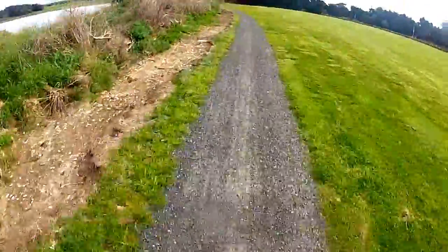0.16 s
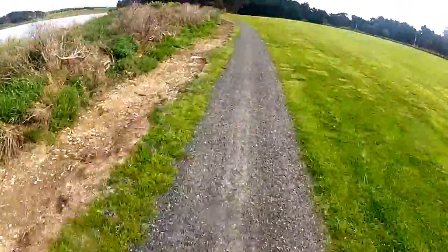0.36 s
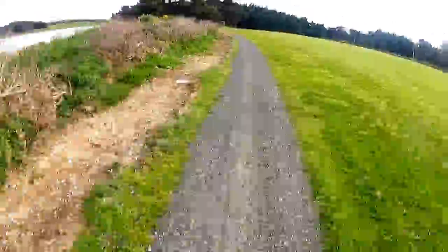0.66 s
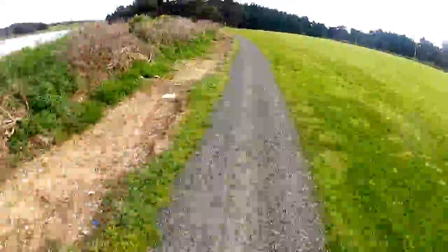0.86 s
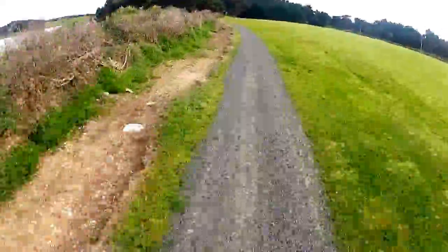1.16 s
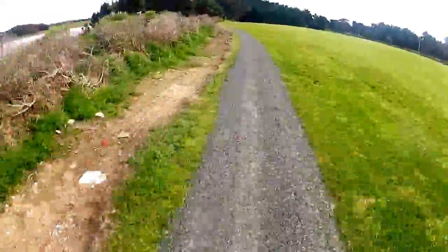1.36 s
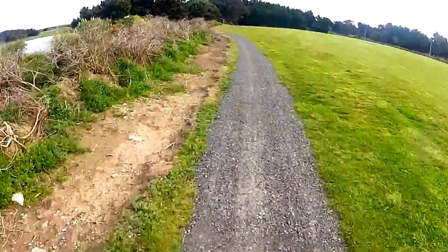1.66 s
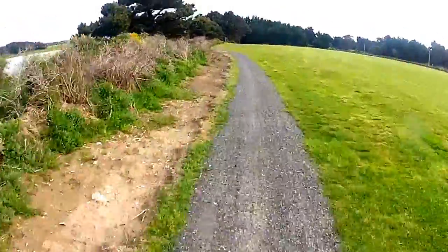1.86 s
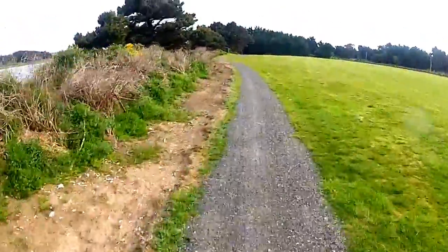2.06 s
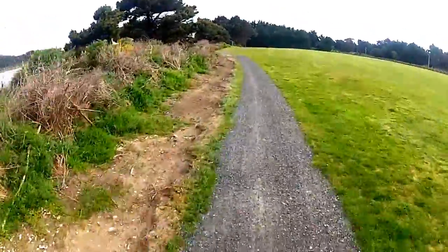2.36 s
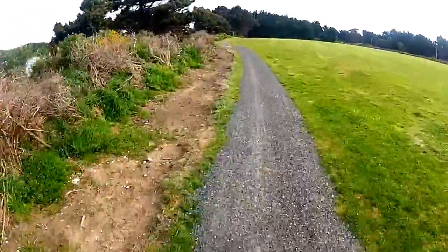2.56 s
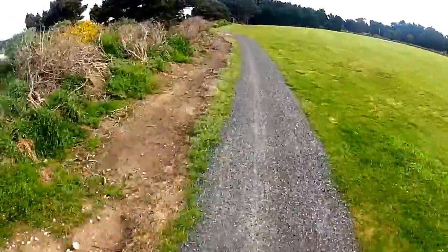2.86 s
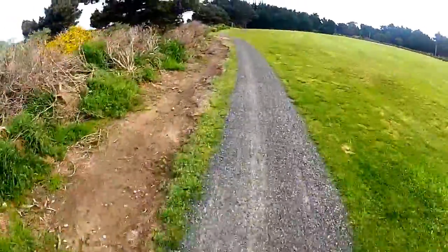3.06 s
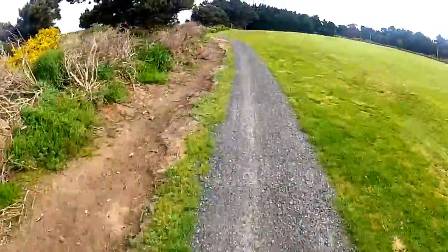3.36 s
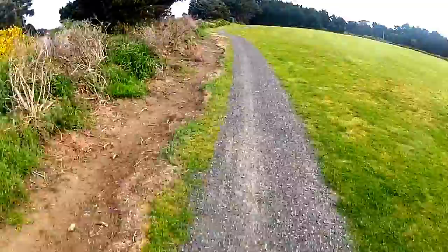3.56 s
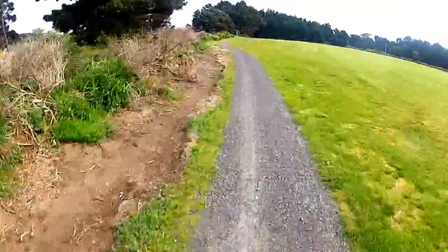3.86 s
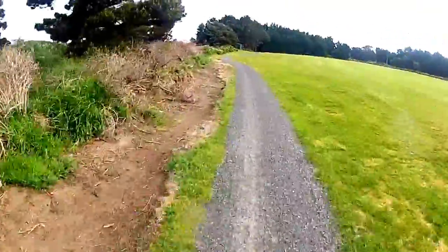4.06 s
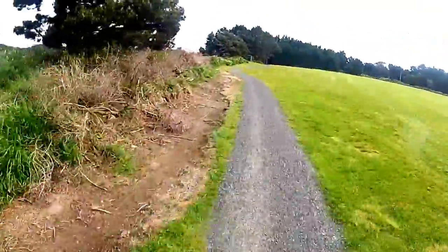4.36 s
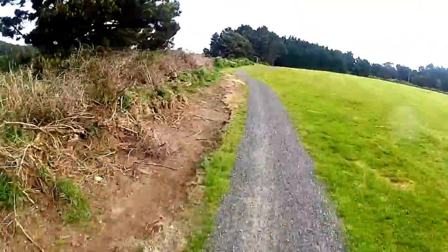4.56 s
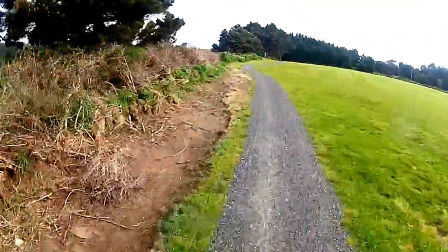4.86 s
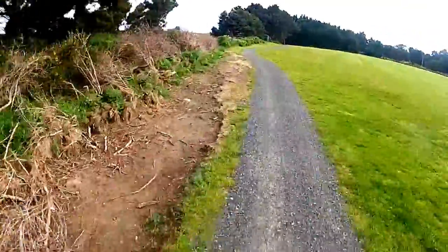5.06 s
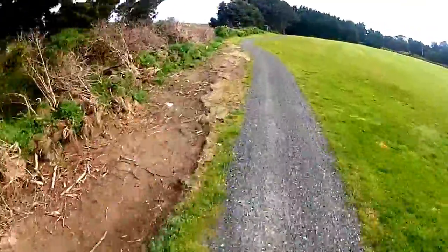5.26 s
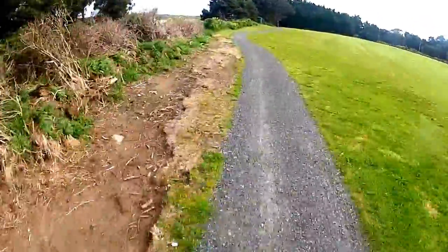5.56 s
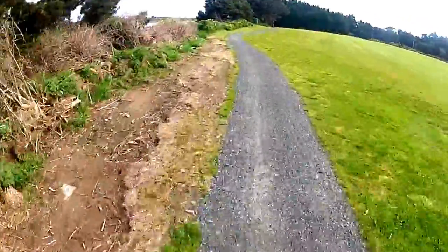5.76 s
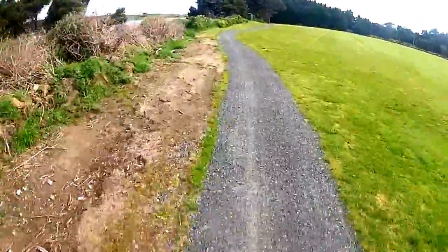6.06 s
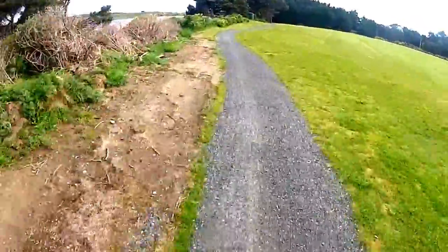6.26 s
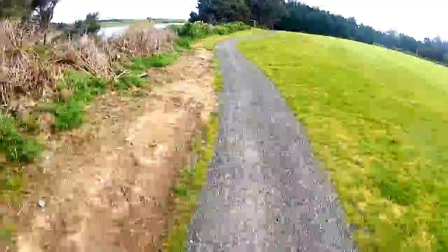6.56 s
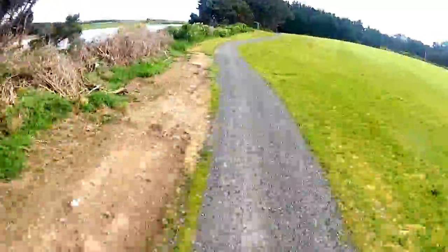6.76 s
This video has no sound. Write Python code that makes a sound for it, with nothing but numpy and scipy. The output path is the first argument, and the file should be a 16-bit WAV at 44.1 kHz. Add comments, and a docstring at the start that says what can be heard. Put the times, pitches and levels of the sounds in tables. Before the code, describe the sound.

Mountain bike tyres roll continuously over a gravel path outdoors, a grainy roar with crackling stones. A fairly smooth start soon gives way to irregular thumps and hollow rattling knocks, with dense clusters around four seconds and shortly before five, then sparser knocks. A few hard dry clacks stand out. Low wind buffets the plastic housing of a camera mounted on the bike, so everything is close and slightly boxy, without echo.

```python
"""Tyres crunch on a gravel path, heard from a camera in a closed plastic housing riding on a mountain bike.
Random trains of tiny impacts, filtered, make the tread and stones; filtered noise makes wind buffeting
and short bright bursts. Bumps thump and shudder the mount; loose parts knock as damped modes, rough with
noise. Hard blows clack dryly as filtered clicks; the right side dips briefly at listed times."""
import sys
import numpy as np
from scipy.fft import rfft, irfft, next_fast_len
from scipy.io import wavfile
from scipy.ndimage import map_coordinates

SR = 44100
rng = np.random.default_rng(int(sys.argv[2]) if len(sys.argv) > 2 else 0)


def transcribe(u):
    """Save the signal u as a 16-bit wav file named by the first command-line argument.

    u: samples, shape (n,) or (channels, n), limited to [-1, 1]; the rate is SR.
    q: integer samples, one column per channel.
    """
    v = np.clip(np.atleast_2d(u).T, -1, 1)
    q = np.round(v * 32767).astype(np.int16)
    wavfile.write(sys.argv[1], SR, q)


N = 304731


def amp(db):
    """Decibels to gain."""
    return 10 ** (np.asarray(db) / 20)


def unit(x):
    """Scaled to rms 1."""
    return x / np.sqrt(np.mean(x ** 2) + 1e-20)


def noise(*shape):
    """White noise."""
    return rng.standard_normal(shape)


def wobble(knots_per_s):
    """A smooth random curve through normally distributed knots."""
    knots = noise(int(N * knots_per_s / SR) + 4)
    return map_coordinates(knots, [np.arange(N) * knots_per_s / SR])


def about_mean(rows):
    """A level curve in dB about its own mean, one value per sample."""
    db = np.interp(np.arange(N) / SR, *np.transpose(rows))
    return db - db.mean()


def coloured(x, points):
    """x through a causal minimum-phase filter with the given (Hz, dB) points."""
    n = x.shape[-1]
    m = 2 * next_fast_len(n // 2 + 2048)
    hz, db = np.transpose(points)
    log_hz = np.log(np.fft.rfftfreq(m, 1 / SR) + 1)
    gain = amp(np.interp(log_hz, np.log(hz), db))
    # folding the cepstrum onto positive time gives minimum phase
    cepstrum = irfft(np.log(gain), m)
    cepstrum[1:m // 2] *= 2
    cepstrum[m // 2 + 1:] = 0
    response = np.exp(rfft(cepstrum))
    return irfft(rfft(x, m) * response, m)[..., :n]


def spread(pair, side_db):
    """Two unrelated signals become the middle and side of a stereo image."""
    mid, side = pair[0], amp(side_db) * pair[1]
    return unit(np.array([mid + side, mid - side]))


def stones(rate, scatter_db):
    """Two random trains of tiny impacts of widely varying size, rate per second on average."""
    struck = rng.random((2, N)) < rate / SR
    sign = np.sign(noise(2, N))
    size = amp(scatter_db * np.minimum(noise(2, N), 2.5))
    return unit(struck * sign * size)


def add(track, s, sound):
    """Mixes a sound into the track from time s."""
    start = max(round(s * SR), 0)
    part = track[..., start:start + sound.shape[-1]]
    part += sound[..., :part.shape[-1]]


def swell(t, attack, t60):
    """A rounded rise and an exponential decay."""
    return (1 - np.exp(-(t / attack) ** 2)) * amp(-60 * t / t60)


def ringing(t, modes, attack, detune):
    """Damped modes, each strike varying their levels and pitches a little."""
    out = np.zeros(len(t))
    for hz, db, t60 in modes:
        level = amp(db + rng.normal(0, 1))
        tone = np.sin(2 * np.pi * hz * rng.normal(1, detune) * t)
        out += level * swell(t, attack, t60) * tone
    return out


def push(t, width, sway, sway_hz, sway_t60, lag):
    """A soft blow centred on t = 0; the camera swings back on its springy mount."""
    after = np.maximum(t - lag, 0)
    swing_back = sway * np.sin(2 * np.pi * sway_hz * after) * amp(-60 * after / sway_t60)
    return np.exp(-.5 * (t / width) ** 2) - swing_back


# Tyre effort on the gravel. Each row: time in seconds, level in dB (only the change about the mean counts).
EFFORT = [(0.0, -53.5), (0.27, -52), (0.75, -50), (0.87, -45), (1.0, -45.5), (1.33, -45.5), (1.5, -47),
          (1.98, -46.5), (2.69, -48.5), (3.4, -48), (3.66, -48), (4.18, -45.5), (4.55, -45), (4.88, -45.5),
          (5.01, -43.5), (5.3, -47), (5.55, -47), (5.72, -47), (5.92, -44), (6.15, -47), (6.32, -49),
          (6.83, -49), (6.91, -48)]
# Spectra of tread roar, stone crunch and bright tick. Each row: frequency in Hz, relative level in dB per Hz.
ROAR_COLOUR = [(250, -11.5), (450, -14), (650, -14), (830, -4), (980, -6.5), (1210, -0.5), (1480, -11.5),
               (2000, -10.5), (4000, -78)]
CRUNCH_COLOUR = [(500, -28), (1100, 2.5), (1500, 2), (1800, 7), (2100, 5.5), (2400, 7.5), (2800, -7.5),
                 (3200, -7), (3600, -7), (4050, -14), (4500, -83), (6000, -84.5)]
SIZZLE_COLOUR = [(6000, -45), (7400, -73), (8400, 11.5), (9000, -4), (9600, 15), (11000, 13.5),
                 (11700, -31.5), (12400, -20), (13100, 14.5), (14300, 10), (15000, -5), (15700, -9.5)]
# level at mean effort; dB per dB of effort
ROAR_DB, ROAR_GROWS = -46, 0.76
CRUNCH_DB, CRUNCH_GROWS = -50, 1.23
PATCH_DB = 1.09  # looser and firmer patches of gravel


def tyres():
    """The tread roars on the ground; stones grind under it in clumps, with a crunch and a bright tick."""
    effort_db = about_mean(EFFORT) + PATCH_DB * wobble(14)
    roar_db = ROAR_DB + ROAR_GROWS * effort_db
    crunch_db = CRUNCH_DB + CRUNCH_GROWS * effort_db
    clumps = wobble(45)
    tread = stones(rate=4000, scatter_db=3.5)
    grit = stones(rate=2500, scatter_db=-0.5)
    hissy_grit = grit + 0.5 * noise(2, N)
    roar = amp(roar_db + 0.74 * clumps) * spread(coloured(tread, ROAR_COLOUR), side_db=-65.0)
    crunch = amp(crunch_db + 0.47 * clumps) * spread(coloured(grit, CRUNCH_COLOUR), side_db=-58.5)
    sizzle = spread(coloured(hissy_grit, SIZZLE_COLOUR), side_db=-42.5)
    return roar + crunch + amp(crunch_db - 8.0 + 1.4 * clumps) * sizzle


# Spectrum of fine flying grit. Each row: frequency in Hz, relative level in dB per Hz.
SPRAY_COLOUR = [(2200, -46), (3100, -13.5), (3600, 10), (4000, -8), (4600, -61), (6000, -76.5)]
SPRAY_DB, SPRAY_GROWS = -66.5, 2.6  # level at mean effort; dB per dB of effort
CLINK_DB, COARSE_DB = -4.5, -7.5  # relative to the crunch
COARSE_PER_S, COARSE_TICK_DB = 60, -11  # tick relative to crackle
CLUSTER_DB = 1.5  # bunching


def pebbles():
    """Bigger stones crackle and clink in clusters, each clink at its own pitch; grit sprays with effort."""
    effort_db = about_mean(EFFORT)
    clinks = np.zeros(N)
    t = np.arange(SR // 25) / SR
    for when, size, pitch, life in rng.random((round(110 * N / SR), 4)):
        hz = 1000 * 2.5 ** pitch
        envelope = swell(t, attack=.0005, t60=.008 + .016 * life)
        add(clinks, when * N / SR, amp(11 * size) * envelope * np.sin(2 * np.pi * hz * t))
    coarse = stones(rate=COARSE_PER_S, scatter_db=2.5)[0]
    tick = amp(COARSE_TICK_DB) * unit(coloured(coarse, SIZZLE_COLOUR))
    crackle = unit(coloured(coarse, CRUNCH_COLOUR)) + tick
    fine = stones(rate=880, scatter_db=3.5)[0]
    spray = amp(SPRAY_DB + SPRAY_GROWS * effort_db) * unit(coloured(fine, SPRAY_COLOUR))
    big_stones = amp(CLINK_DB) * unit(clinks) + amp(COARSE_DB) * crackle
    big_stones = amp(CRUNCH_DB + CRUNCH_GROWS * effort_db) * big_stones
    return amp(CLUSTER_DB * wobble(17)) * (spray + big_stones)


FULL_JOLT_DB = -13  # peak of a full jolt


def rough_ground(width_s):
    """Rises from 0 on even path towards 1 around the hardest jolts."""
    t = np.arange(N) / SR
    bumps = sum(amp(db - FULL_JOLT_DB) * np.exp(-.5 * ((t - s) / width_s) ** 2) for s, db in JOLTS)
    return np.tanh(bumps)


# Air on the housing. Each row: time in seconds, level in dB (only the change about the mean counts).
WIND_LEVEL = [(0.0, -43.5), (0.18, -44.5), (0.3, -57.5), (0.48, -46.5), (0.76, -38.5), (1.06, -52.5),
              (1.4, -41), (1.9, -53), (2.13, -42.5), (2.7, -46), (2.89, -55), (3.03, -44), (3.5, -43),
              (3.78, -37), (4.7, -43), (4.88, -45), (5.0, -40), (5.15, -44), (5.72, -52.5), (6.12, -38.5),
              (6.5, -46), (6.76, -36), (6.91, -34)]
# Spectra of wind buffeting and road judder. Each row: frequency in Hz, relative level in dB per Hz.
BUFFET_COLOUR = [(8, -6), (20, 7), (36, -4), (55, -10), (90, -17.5), (200, -60.5), (500, -105)]
JUDDER_COLOUR = [(40, -16), (90, -2.5), (140, 0.5), (210, 3.5), (330, -3.5), (450, -24), (900, -71.5)]
BUFFET_DB, BUFFET_GROWS = -40, 0.52  # level in mean wind; dB per dB of wind
JUDDER_DB, JUDDER_GROWS = -54.5, 0.26  # level on even ground at mean effort; dB per dB of effort
# scale of the swell around a jolt; its limit in dB
LURCH_S, LURCH_DB = 0.025, 11
SHUDDER_S, SHUDDER_DB = .02, 11
GUST_DB = -1.5


def rumble():
    """Wind buffets the housing while the ground makes it judder; both swell around the jolts."""
    buffet_db = BUFFET_DB + BUFFET_GROWS * about_mean(WIND_LEVEL)
    buffet_db = buffet_db + LURCH_DB * rough_ground(LURCH_S) + GUST_DB * wobble(18)
    judder_db = JUDDER_DB + JUDDER_GROWS * about_mean(EFFORT)
    judder_db = judder_db + SHUDDER_DB * rough_ground(SHUDDER_S) + 1.9 * wobble(25)
    buffet = spread(coloured(noise(2, N), BUFFET_COLOUR), side_db=-68.5)
    judder = spread(coloured(stones(rate=400, scatter_db=4.5), JUDDER_COLOUR), side_db=-38.5)
    return amp(buffet_db) * buffet + amp(judder_db) * judder


KNOCK_DB = -21  # ring of an ordinary knock


def follows(rule, ring_db):
    """The level of one part of a knock whose ring has the given level."""
    ordinary_db, grows = rule
    return ordinary_db + grows * (ring_db - KNOCK_DB)


# Ring of the housing and hollow clack. Each row: frequency in Hz, level in dB, t60 in seconds.
HOUSING_MODES = [(1214, -3, 0.026), (1156, -17.5, 0.01), (1490, -0.5, 0.0099), (1774, -9, 0.014),
                 (2155, -14, 0.009)]
HOLLOW_MODES = [(819, -0.5, 0.022), (880, -11, 0.0096), (278, -25, 0.017)]
# level in dB in an ordinary knock; dB per dB of ring
KNOCK_HOLLOW = (-31, 0.7)
KNOCK_RASP, KNOCK_TICK = (-54, 0.93), (-61.5, 1)
KNOCK_BRIGHT_BURST = (-91, 2.4)  # a faint burst of bright noise with the knock
KNOCK_SHUDDER, KNOCK_SCUFF = (-51, 0.45), (-54, 0.42)
LEAD_S = .005  # contact comes this far into the blow
BOUNCE_S, BOUNCE_LOSS_DB = .004, 9.5  # mean flight; loss per bounce


def blow(ring_db, thud_db):
    """A thud, hollow clack and short housing ring, roughened by noise; the part bounces twice."""
    t_raw = np.arange(SR // 10) / SR
    t = np.maximum(t_raw - LEAD_S, 0)
    chatter = noise(len(t)) * swell(t, attack=.0008, t60=.018)
    parts = [(KNOCK_RASP, CRUNCH_COLOUR), (KNOCK_TICK, SIZZLE_COLOUR), (KNOCK_BRIGHT_BURST, BURST_COLOUR),
             (KNOCK_SHUDDER, JUDDER_COLOUR), (KNOCK_SCUFF, ROAR_COLOUR)]
    rough = sum(amp(follows(rule, ring_db)) * unit(coloured(chatter, colour)) for rule, colour in parts)
    thud = push(t_raw - LEAD_S - .0015, width=0.0011, sway=0.49, sway_hz=62.7, sway_t60=0.041, lag=0.0012)
    sound = rough + amp(thud_db) * thud
    hollow_db = follows(KNOCK_HOLLOW, ring_db)
    for bounce in range(3):
        since = np.maximum(t - bounce * BOUNCE_S * (.5 + rng.random()), 0)
        ring = amp(ring_db) * ringing(since, HOUSING_MODES, attack=.0012, detune=.03)
        clack = amp(hollow_db) * ringing(since, HOLLOW_MODES, attack=.0011, detune=.025)
        sound = sound + amp(-BOUNCE_LOSS_DB * bounce) * (ring + clack)
    return sound


RATTLES_PER_S, RATTLE_DB, RATTLE_THUD_DB = 4.8, -40.5, -47.5
RATTLE_SCATTER_DB, RATTLE_GROWS = 5.5, 0.81  # scatter either way; dB per dB of effort


def rattles():
    """Faint knocks come at random, stronger when the tyres work harder."""
    out, effort_db = np.zeros((2, N)), about_mean(EFFORT)
    for when, size in rng.random((round(RATTLES_PER_S * N / SR), 2)):
        lift_db = RATTLE_GROWS * effort_db[int(when * N)] + RATTLE_SCATTER_DB * (2 * size - 1)
        add(out, when * N / SR, blow(RATTLE_DB + lift_db, RATTLE_THUD_DB + lift_db))
    return out


# Single stones under the tread. Each row: start in seconds, level of the rasp in dB.
STONE_CRUNCHES = [(0.037, -58.5), (0.1305, -55.5), (0.431, -62), (0.508, -54), (0.661, -53),
                  (0.7257, -56.5), (0.954, -51), (1.1829, -49.5), (1.2765, -50.5), (1.362, -52.5),
                  (2.28, -52), (2.352, -47.5), (2.455, -52.5), (2.58, -57.5), (3.628, -55), (3.905, -51.5),
                  (4.678, -47.5), (4.932, -60), (5.167, -57.5), (5.758, -54), (6.832, -52.5)]
CRUNCH_TICK_DB = -10  # relative to the rasp


def crunches():
    """A single stone grinds under the tread: a rasp and a bright tick, with no ring."""
    out = np.zeros(N)
    t = np.arange(SR // 10) / SR
    for s, db in STONE_CRUNCHES:
        chatter = noise(len(t)) * swell(t, attack=.0008, t60=.018)
        rasp = unit(coloured(chatter, CRUNCH_COLOUR))
        tick = amp(CRUNCH_TICK_DB) * unit(coloured(chatter, SIZZLE_COLOUR))
        add(out, s, amp(db) * (rasp + tick))
    return out


# Short bright noise bursts. Each row: start in seconds, level in dB before an 11 dB lift,
# t60 in seconds, treble against the body in dB.
BRIGHT_BURSTS = [(0.1915, -56, 0.025, -1.5), (0.2813, -66, 0.026, -10), (2.2793, -52, 0.026, -7),
                 (2.5838, -42, 0.017, -5), (2.7645, -47, 0.022, -0.5)]
# Spectrum of a burst. Each row: frequency in Hz, relative level in dB per Hz.
BURST_COLOUR = [(2500, -23.5), (4400, 7), (5500, -15), (7000, -10), (9000, 6), (11500, -3.5), (15000, -13)]
BURST_ATTACK_S, BURST_TILT_HZ = .0028, 6000  # treble lies above the tilt


def bright_bursts():
    """Short bright noise bursts, some dull and some bright: filtered noise that rises fast and decays."""
    out = np.zeros(N)
    t = np.arange(SR // 15) / SR
    for s, db, t60, treble_db in BRIGHT_BURSTS:
        colour = [(hz, level + treble_db * (hz > BURST_TILT_HZ)) for hz, level in BURST_COLOUR]
        burst = swell(t, BURST_ATTACK_S, t60) * unit(coloured(noise(len(t)), colour))
        add(out, s, amp(db + 11.0) * burst)
    return out


# Loose parts. Each row: contact in seconds, level of the ring in dB, level of the thud in dB.
LOOSE_KNOCKS = [(0.5083, -28, -31), (0.6519, -27.5, -40), (0.6606, -25, -47), (0.7265, -32, -27),
                (0.9546, -23, -23), (0.9641, -25.5, -25.5), (1.175, -21, -24), (1.191, -27, -33),
                (1.2972, -23, -23.5), (1.3623, -24.5, -25.5), (1.4605, -24, -23), (1.6855, -22, -35),
                (2.0263, -23.5, -39), (2.046, -25.5, -21.5), (2.136, -36, -35), (2.49, -34.5, -30),
                (2.531, -25.5, -28), (2.5802, -33.5, -25.5), (2.5898, -11, -25), (2.771, -28, -22),
                (2.7878, -19, -30), (2.936, -35.5, -27), (2.952, -26, -25), (3.0464, -30.5, -34),
                (3.1519, -24.5, -30.5), (3.32, -31, -29.5), (3.6085, -29, -28.5), (3.724, -29, -37),
                (3.8034, -31.5, -29.5), (3.9063, -23, -26.5), (3.9612, -17, -23), (3.9766, -19.5, -26),
                (3.9962, -13.5, -17), (4.011, -20.5, -35), (4.058, -22.5, -24.5), (4.0804, -25, -30),
                (4.133, -20.5, -25), (4.341, -30.5, -34), (4.444, -36, -32), (4.4697, -22.5, -26),
                (4.53, -30, -31), (4.612, -36, -52), (4.683, -13.5, -37), (4.692, -16.5, -34),
                (4.706, -22, -20), (4.718, -21.5, -24), (4.731, -24, -41), (4.7476, -18.5, -24),
                (4.7576, -13.5, -21), (4.794, -25, -29), (4.8105, -25.5, -42), (4.9351, -23, -26.5),
                (4.9596, -28.5, -30.5), (5.165, -30, -39), (5.197, -30.5, -43), (5.5477, -23.5, -29.5),
                (5.803, -24.5, -25), (6.039, -29, -38), (6.0769, -38.5, -33), (6.171, -26, -30.5),
                (6.293, -37.5, -34.5), (6.538, -28.5, -28), (6.6894, -27, -31), (6.8143, -30, -27.5),
                (6.8354, -27.5, -25), (6.8605, -25, -37)]


def knocks():
    """Loose parts knock; a harder ring brings a stronger hollow clack and more rough noise."""
    out = np.zeros((2, N))
    for s, ring_db, thud_db in LOOSE_KNOCKS:
        add(out, s - LEAD_S, blow(ring_db, thud_db))
    return out


# The mount hits its stop on a bump. Each row: time of the thump in seconds, its peak in dB.
JOLTS = [(0.567, -19), (0.6523, -18.5), (0.8, -21), (0.8404, -24), (1.01, -27), (1.1846, -26),
         (1.298, -22.5), (1.463, -19), (1.703, -17.5), (1.771, -25.5), (1.795, -28.5), (2.023, -23),
         (2.0526, -20.5), (2.212, -27), (2.233, -29), (2.2946, -26.5), (2.3306, -29), (2.6141, -24),
         (2.7358, -19), (2.7886, -16), (2.9583, -17.5), (3.6451, -20), (3.97, -25), (4.001, -14),
         (4.2151, -27.5), (4.275, -21.5), (4.405, -19), (4.5747, -19.5), (4.682, -21), (4.712, -26),
         (4.7555, -23), (4.801, -25), (5.24, -27.5), (5.286, -26), (5.329, -24), (5.3952, -33),
         (5.611, -22.5), (5.813, -38.5), (6.6172, -19.5), (6.6858, -43), (6.746, -39), (6.8768, -19.5)]
# Shudder of the mount. Each row: frequency in Hz, level relative to the thump in dB, t60 in seconds.
MOUNT_MODES = [(197, -18, 0.017), (300, -16, 0.018)]
JOLT_EARLY_S, JOLT_SCRUNCH_DB = 0.0029, -22  # shudder and scrunch precede the peak; scrunch re thump


def jolts():
    """Each bump gives a dull thump, a short shudder of the mount and a scrunch of stones."""
    out, lead_s = np.zeros(N), .01
    t = np.arange(SR // 6) / SR - lead_s
    after = np.maximum(t + JOLT_EARLY_S, 0)
    thump = push(t, width=0.0014, sway=0.93, sway_hz=41.1, sway_t60=0.1, lag=0.0034)
    for s, db in JOLTS:
        shudder = ringing(after, MOUNT_MODES, attack=.002, detune=.1)
        scrunch = swell(after, attack=0.0022, t60=.05) * unit(coloured(noise(len(t)), CRUNCH_COLOUR))
        add(out, s - lead_s, amp(db) * (shudder + amp(JOLT_SCRUNCH_DB) * scrunch - thump))
    return out


# Hard blows. Each row: start in seconds, peak in dB, rebound delay in seconds, rebound in dB re the blow.
HARD_CLACKS = [(0.7933, -12, 0.0056, -8.5), (1.4476, -19.5, 0.0028, -16), (1.7057, -14.5, 0.0026, -10),
               (3.9968, -16.5, 0.0025, -18), (4.2539, -8, 0.0039, -13), (4.6845, -17, 0.0034, -12),
               (4.758, -21.5, 0.0025, -13), (6.5625, -8, 0.0037, -14)]
# Spectrum of the dry clack. Each row: frequency in Hz, relative level in dB.
CLACK_COLOUR = [(100, -12.5), (200, -9), (340, -5.5), (460, -21), (600, -15.5), (700, -9), (805, -1),
                (900, -6.5), (1050, -4), (1230, 4), (1460, -27.5), (1850, -11), (2100, -17.5),
                (2350, -17.5), (2700, -33.5), (3600, -31.5), (4500, -45), (6000, -80)]
CLACK_GRIT_DB, CLACK_GRIT_T60_S, CLACK_TICK_DB = -26, 0.094, -19.5  # levels relative to the peak
CLACK_SEAT_S, CLACK_SEAT_DB = 0.001276, -5.5  # second touch as the part seats
CLACK_VARIES_DB, CLACK_DETUNE = 1.3, .025  # colour and pitch (share), blow to blow


def clacks():
    """A hard contact and weaker rebound sound the whole housing; the contact rasps, stirred stones crunch."""
    out = np.zeros(N)
    t = np.arange(SR // 10) / SR
    for s, db, rebound_s, rebound_db in HARD_CLACKS:
        contact = 1. * (t == 0)
        add(contact, CLACK_SEAT_S, amp([CLACK_SEAT_DB]))
        pitch = rng.normal(1, CLACK_DETUNE)
        colour = [(hz * pitch, level + rng.normal(0, CLACK_VARIES_DB)) for hz, level in CLACK_COLOUR]
        clack = coloured(contact, colour)
        clack = clack / np.abs(clack).max()
        grit = swell(t, attack=0.0042, t60=CLACK_GRIT_T60_S) * unit(coloured(noise(len(t)), CRUNCH_COLOUR))
        tick = swell(t, attack=0.00077, t60=0.019) * unit(coloured(noise(len(t)), SIZZLE_COLOUR))
        add(out, s, amp(db) * (clack + amp(CLACK_GRIT_DB) * grit + amp(CLACK_TICK_DB) * tick))
        add(out, s + rebound_s, amp(db + rebound_db) * clack)
    return out


# Dips of the right side. Each row: start in seconds, share lost from 0 to 1.
RIGHT_DIPS = [(0.7979, 1), (1.71, 0.4), (2.591, 0.87), (3.999, 0.93), (4.2534, 0.93), (4.683, 0.8),
              (6.5592, 0.85)]
DIP_S, DIP_EDGE_S = .021, .0007


def right_dips(pair):
    """The right side's level dips briefly, with smooth edges."""
    t = np.arange(N) / SR
    lost = np.zeros(N)
    for s, share in RIGHT_DIPS:
        fall = np.tanh((t - s) / DIP_EDGE_S)
        recovery = np.tanh((t - s - DIP_S) / DIP_EDGE_S)
        lost += np.clip(share, 0, 1) * (fall - recovery) / 2
    return np.array([pair[0], pair[1] * (1 - lost)])


def scene():
    """Tyres, bright bursts, rumble and the bumps of the ride."""
    ground = tyres() + pebbles() + crunches()
    return ground + bright_bursts() + rumble() + rattles() + knocks() + jolts() + clacks()


TOP_HZ = 15600


def record(dry):
    """The right side dips; the camera keeps nothing above its band limit."""
    m = next_fast_len(N + SR // 4)
    kept = np.fft.rfftfreq(m, 1 / SR) < TOP_HZ
    return irfft(rfft(right_dips(dry), m) * kept, m)[..., :N]


dry = scene()
out = record(dry)
transcribe(out)
```